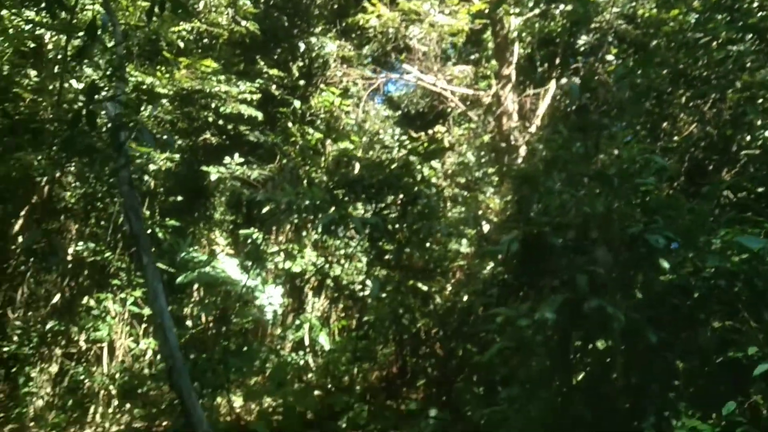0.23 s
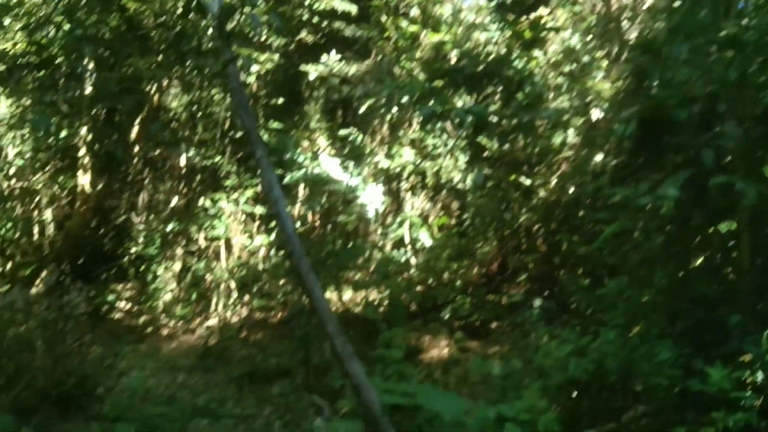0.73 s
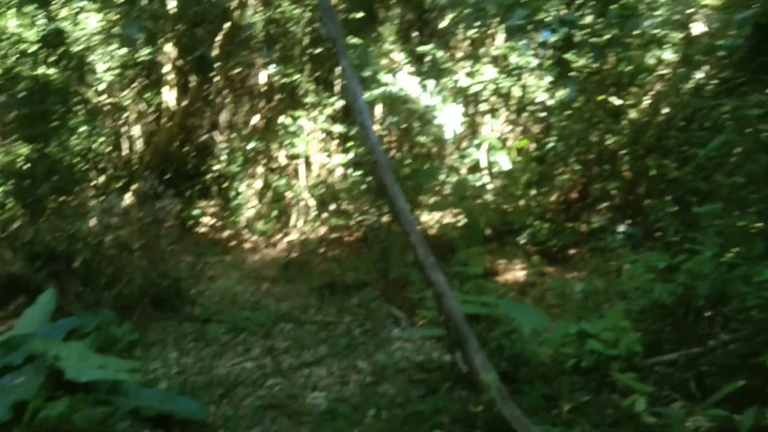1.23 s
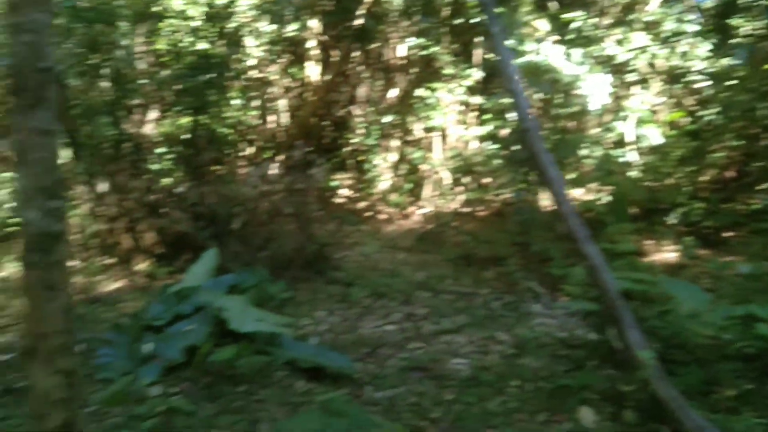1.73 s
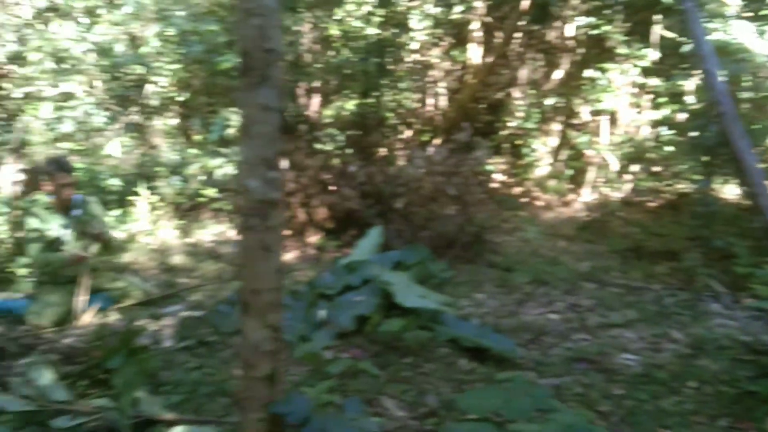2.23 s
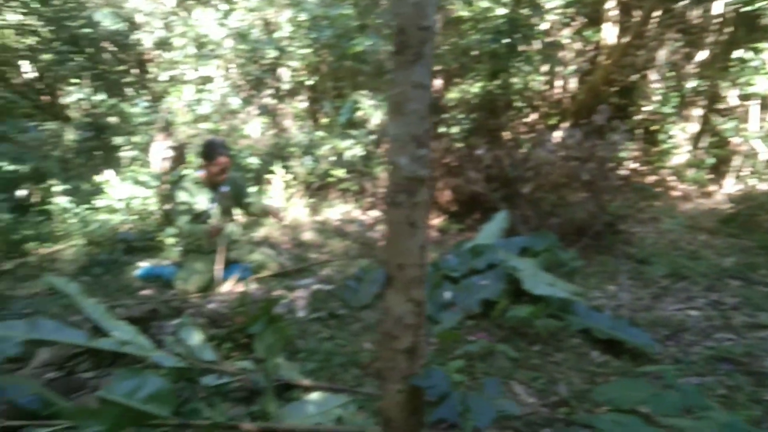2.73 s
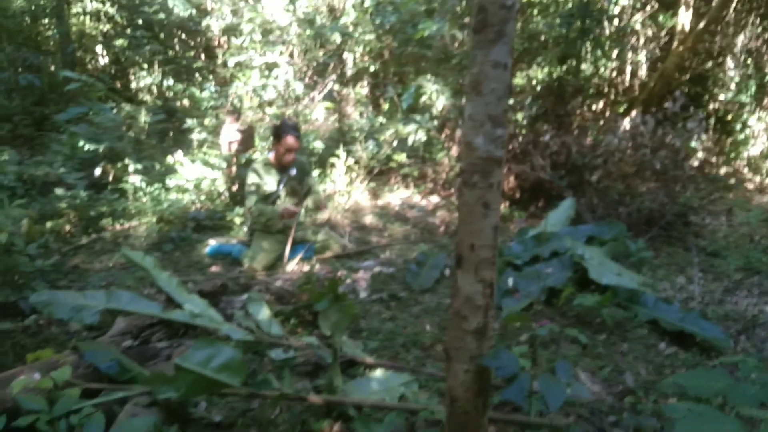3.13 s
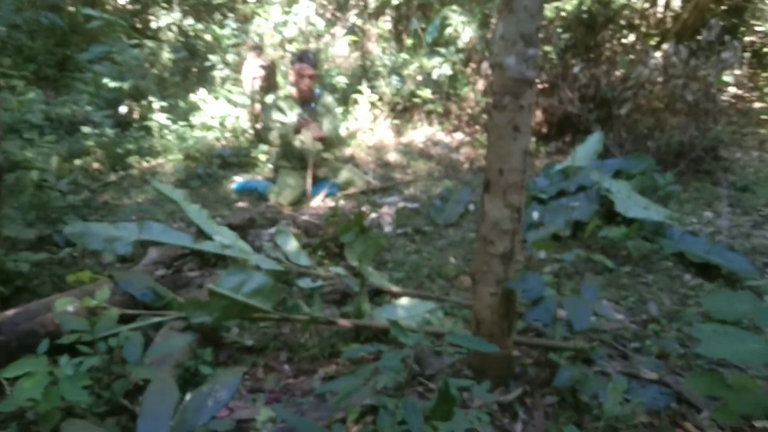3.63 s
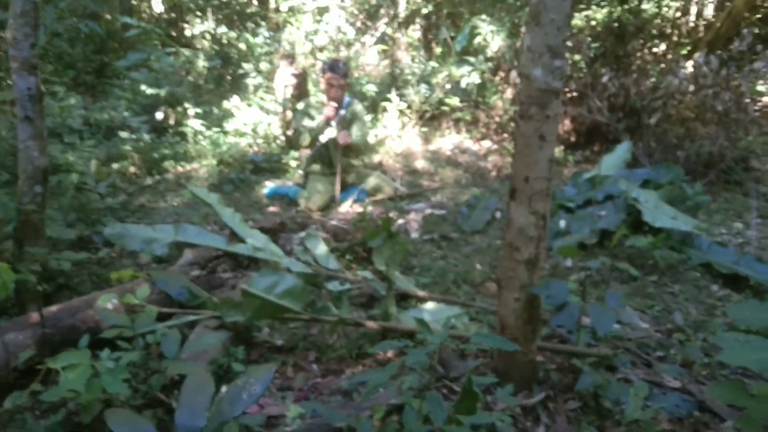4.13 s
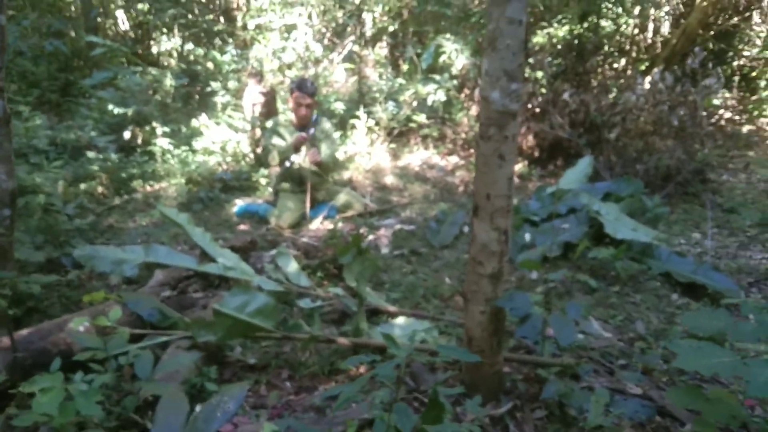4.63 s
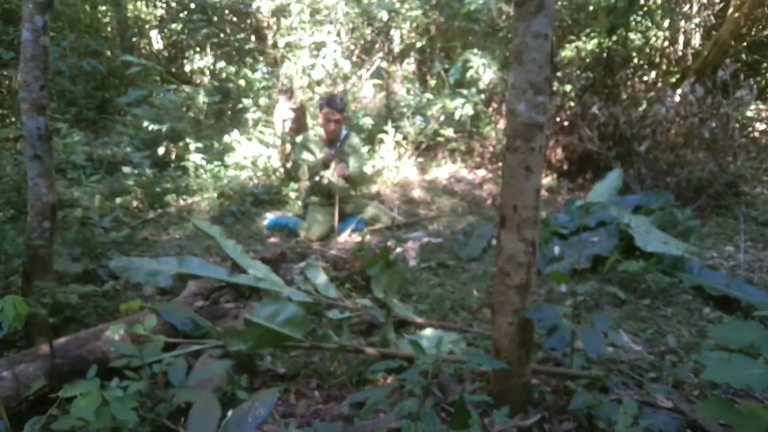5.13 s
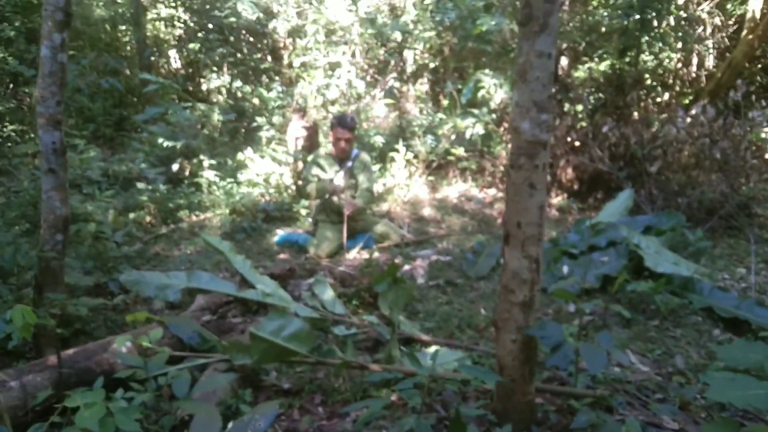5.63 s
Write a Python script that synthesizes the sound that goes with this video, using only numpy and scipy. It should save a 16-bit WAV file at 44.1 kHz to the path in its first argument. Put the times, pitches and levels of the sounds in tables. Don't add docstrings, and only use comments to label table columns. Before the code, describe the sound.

A quiet woodland heard through a small mono hand-held device. Someone steps slowly through brittle undergrowth, tearing twigs and leaf ribs in millisecond bursts. Low thumps and short woody knocks come through the housing. After a lull, a stalk cracks, more leaves snap, twigs whip the plastic hard, a leaf rasps along cloth, and a final knock and crackle close it. Distant cicadas throb and a cricket chirps faintly under thin hiss.

```python
import sys
import numpy as np
from scipy import signal
from scipy.fft import rfft, irfft
from scipy.io import wavfile

SR = 44100
rng = np.random.default_rng(int(sys.argv[2]) if len(sys.argv) > 2 else 0)


def amplitude_ratio(level_db):
    exponent = np.asarray(level_db, float) / 20
    return 10 ** exponent


def store_pcm(level_fs):
    pcm = np.round(np.clip(level_fs, -1, 1) * 32767).astype(np.int16)
    wavfile.write(sys.argv[1], SR, np.atleast_2d(pcm).T)


N = 259925

# f/Hz, density/dB per Hz
LEAVES = [(530, -37.5), (900, -6), (1770, -4.5), (2070, 0), (2300, -2.5), (2890, -3.5), (3550, -4),
          (5680, -5), (6250, -3), (6890, -7), (8150, -18), (11800, -30.5), (16000, -34)]


def rms_one(x):
    return x / np.sqrt(np.mean(x ** 2) + 1e-20)


def in_time(rows):
    s, *columns = np.transpose(rows)
    return [np.interp(np.arange(N) / SR, s, c) for c in columns]


def add(out, s, sound):
    at = round(s * SR)
    out[at:at + len(sound)] += sound[:N - at]


def colour(x, spectrum):
    hz, db = np.transpose(spectrum)
    bin_hz = np.arange(2049) * SR / 4096
    log_gain = np.log(amplitude_ratio(np.interp(np.log(bin_hz + 1), np.log(hz), db)))
    cepstrum = irfft(log_gain)
    cepstrum[1:2048] *= 2
    cepstrum[2049:] = 0
    response = irfft(np.exp(rfft(cepstrum)))
    return signal.fftconvolve(x, response / np.sqrt(np.sum(response ** 2)))[:len(x)]


def drift(rate_hz):
    r = np.exp(-2 * np.pi * rate_hz / SR)
    noise = rng.standard_normal(N + SR)
    return rms_one(signal.lfilter([1], [1, -2 * r, r * r], noise)[SR:])


def resonate(x, hz, width_hz):
    r = np.exp(-np.pi * width_hz / SR)
    poles = [1, -2 * r * np.cos(2 * np.pi * hz / SR), r * r]
    return signal.lfilter([(1 - r * r) / 2, 0, (r * r - 1) / 2], poles, x)


def resonate_steep(x, hz, width_hz):
    return resonate(resonate(x, hz, width_hz), hz, width_hz)


def crackle(per_s, spread_db):
    sizes = amplitude_ratio(spread_db * np.minimum(rng.exponential(1, N), 4)) * rng.choice([-1, 1], N)
    struck = rng.random(N) < per_s / SR
    return rms_one(sizes * struck / np.sqrt(per_s))


def flakes(per_s, spread_db, cycles):
    clicks = crackle(per_s, spread_db)
    pitches_hz = np.geomspace(900, 15000, 24)
    dealt = rng.integers(0, len(pitches_hz), N)
    total = np.zeros(N)
    for k, hz in enumerate(pitches_hz):
        own_clicks = clicks * (dealt == k) + 1e-18
        total += np.sqrt(hz) * rms_one(resonate(own_clicks, hz, hz / cycles))
    return rms_one(total)


def cracks():
    # peak t/s, peak level/dB, ring f/Hz
    early_ticks = [(0.3029, -30.5, 3720), (0.3056, -22.5, 3990), (0.307, -28, 3740), (0.3093, -30, 2970),
                   (0.311, -32, 2470), (0.3206, -27.5, 5000), (0.3228, -35, 5430), (0.331, -41, 3270),
                   (0.6014, -21.5, 4880), (0.6032, -22, 4380), (0.6057, -31, 3750), (0.61, -38, 4570),
                   (0.6124, -34, 4050), (0.6167, -35, 4570), (0.668, -17, 4070), (0.671, -23, 3700),
                   (0.6752, -32, 5100), (0.679, -33, 3360), (0.6816, -35, 3190), (0.6868, -33, 3860),
                   (0.689, -43, 4390), (0.9945, -48, 4160), (0.9972, -40, 3670), (0.9991, -41, 3770),
                   (1.003, -49, 3160), (1.3645, -37, 4050), (1.369, -42, 3720), (1.371, -34, 3620),
                   (1.3747, -37, 3960), (1.3768, -31, 3870), (1.3915, -28, 4260), (1.3943, -27, 5350),
                   (1.4066, -30, 3700), (1.4087, -30, 3930), (1.4135, -31, 3450), (1.416, -25, 3620),
                   (1.4187, -30, 5030), (1.4215, -30, 5340), (1.4255, -29, 3620), (1.428, -25, 3620),
                   (1.431, -30, 5740), (1.4338, -16, 3650), (1.435, -32.5, 4100), (1.4369, -16, 5140),
                   (1.44, -22, 5000), (1.4427, -30, 6500), (1.4459, -25, 3700), (1.4507, -17, 3374),
                   (1.4577, -21.5, 5170), (1.4605, -23.5, 4010), (1.4628, -20, 3750), (1.4655, -30, 1680),
                   (1.4717, -34, 3360), (1.4745, -41, 3840), (1.483, -37, 3800), (1.4948, -32, 2020),
                   (1.4975, -32, 2150)]
    # peak t/s, peak level/dB, ring f/Hz
    late_ticks = [(3.6576, -32, 5340), (3.66, -32, 4230), (3.6633, -38, 1780), (3.6655, -44, 1710),
                  (3.6867, -51, 4740), (3.6941, -50, 1970), (3.7115, -45, 1680), (3.7151, -45, 2070),
                  (4.1278, -46, 1940), (4.1317, -47, 1840), (4.1627, -25, 4650), (4.1656, -34, 1960),
                  (4.1676, -31, 4650), (4.1692, -37, 4740), (4.171, -37, 4480), (4.1734, -49, 2330),
                  (4.2576, -45, 4390), (4.267, -44, 3730), (4.2686, -46, 2930), (4.3143, -41, 3680),
                  (4.3158, -39, 4220), (4.3185, -52, 4310), (4.3211, -52, 4310), (5.0136, -41, 2400),
                  (5.0158, -42, 3900), (5.5585, -48.5, 2480), (5.5645, -44.5, 3100), (5.6485, -37, 3670),
                  (5.651, -36, 2170), (5.6548, -41, 4030), (5.6564, -24, 3600), (5.6583, -31, 2410),
                  (5.6606, -25.5, 3880), (5.6663, -32, 3440), (5.6689, -34, 3620), (5.6715, -24.5, 3620),
                  (5.6741, -28, 3600), (5.6771, -40, 4570), (5.6793, -35, 3880), (5.6828, -33, 3960),
                  (5.6892, -38, 3700), (5.6916, -36, 5770), (5.7055, -39, 3620), (5.8297, -47, 3190),
                  (5.8651, -40.5, 1580), (5.8683, -41, 3100), (5.8743, -46, 2840)]
    # peak t/s, peak level/dB
    stalks = [
        (3.212, -35),
        (3.215, -31),
        (3.2231, -39),
        (3.2267, -15),
        (3.232, -42),
    ]
    # peak t/s, peak level/dB, ring f/Hz,
    # length/s
    ribs = [(0.3024, -28, 4000, 0.00035), (0.3039, -21.5, 2950, 0.00033), (0.305, -34, 5570, 0.00045),
            (0.6017, -25, 3595, 0.00071), (.602, -27.5, 1690, 0.00058), (.6685, -25, 2230, 0.0005),
            (0.6693, -21.5, 3400, 0.00057), (0.96, -49.5, 1100, 0.00013), (1.498, -27.5, 3790, 0.00044),
            (2.183, -52, 1500, 0.00022), (1.3582, -36, 3450, 0.00032), (1.5042, -28.5, 1400, 0.00037),
            (2.15, -59, 2300, 0.00023), (2.194, -61, 2410, 0.0018), (2.815, -49.5, 1540, 0.00027),
            (2.886, -52, 1500, .0002), (3.315, -48, 2150, .0006), (3.475, -42, 2205, 0.00028),
            (3.6607, -31, 1670, 0.00063), (4.161, -21.5, 4420, 0.00047), (4.1616, -32, 2060, 0.00055),
            (4.165, -45, 7000, 0.00054), (4.317, -47, 7000, 0.00062), (5.488, -49, 3500, .0002),
            (5.52, -47, 1490, 0.00024)]
    tick_ratio, stalk_hz = 1.4, 3000
    found = []
    for s, db, hz in early_ticks + late_ticks:
        second_hz = hz * tick_ratio if hz < 4000 else hz / tick_ratio
        found.append((s, db + 3, hz, second_hz, 0.0003, -4))
    for s, db in stalks:
        found.append((s, db, stalk_hz, 2.135 * stalk_hz, 0.000106, -7.5))
    for s, db, hz, length_s in ribs:
        found.append((s, db, hz, 1.45 * hz, length_s, -2.5))
    return found


def snaps():
    # f/Hz, density/dB per Hz
    tearing = [(400, -40), (700, -11), (1170, -17.5), (1800, -6), (3160, -4), (5050, -6.5), (6500, -10),
               (8000, -19.5), (9500, -26.5), (12000, -44), (15000, -37), (16400, -43)]
    out, t = np.zeros(N), np.arange(1500) / SR
    for s, db, main_hz, second_hz, length_s, broad_db in cracks():
        age = t / length_s
        burst = rng.standard_normal(len(t)) * age * np.exp(-age)
        main = rms_one(resonate_steep(burst, main_hz, 600))
        second = rms_one(resonate_steep(burst, second_hz, 1000))
        broad = rms_one(colour(burst, tearing))
        sound = main - amplitude_ratio(-7) * second + amplitude_ratio(broad_db + 0.5) * broad
        peak_at = np.abs(sound).argmax()
        add(out, s - peak_at / SR, amplitude_ratio(db) * sound / np.abs(sound).max())
    return out


def settling():
    # t/s, level/dB, centre f/Hz, t60/s
    settles = [(0.177, -67, 2800, 2.1), (0.3, -48, 3930, 0.37), (0.602, -47.5, 4330, 0.55),
               (0.666, -49, 3400, 0.43), (0.959, -66.5, 4000, 0.27), (0.995, -59, 3700, 0.23),
               (1.361, -43.5, 3720, 0.52), (1.387, -47, 4600, .54), (1.41, -44, 3750, 0.19),
               (1.431, -40.5, 5140, 0.25), (1.458, -53, 2870, 0.9), (3.012, -63.5, 2900, 0.77),
               (3.227, -66, 2740, 0.51), (3.653, -46.5, 5000, 0.045), (4.163, -61, 3400, 0.7),
               (4.313, -49, 4200, 0.1), (5.011, -50.5, 4530, 0.13), (5.556, -64.5, 2720, 2.8),
               (5.645, -45, 3380, 0.44), (5.668, -47, 4200, 0.32), (5.824, -57, 3400, 0.32),
               (5.864, -55, 2950, 0.076)]
    # t/s, level/dB, t60/s
    shuffles = [
        (2.178, -63.5, 0.91),
        (2.315, -68, .46),
        (2.462, -63.5, 0.37),
        (2.66, -64, 0.68),
        (2.815, -62, 0.37),
        (3.069, -67.5, .8),
        (3.667, -53.5, 0.32),
        (3.69, -57.5, 0.28),
        (4.128, -56.5, 0.95),
        (4.638, -42, 0.053),
    ]
    out, t = np.zeros(N), np.arange(SR // 2) / SR
    fine = amplitude_ratio(0.63 * drift(73.7)) * flakes(6000, spread_db=1.5, cycles=9.2)
    for s, db, hz, t60_s in settles + [(s, db, None, t60_s) for s, db, t60_s in shuffles]:
        grains = fine[round(s * SR):][:len(t)]
        age = t[:len(grains)]
        fading = grains * (1 - np.exp(-age / 0.0012)) * amplitude_ratio(db - 60 * age / t60_s)
        fresh = fading * np.exp(-age / 0.44)
        if hz:
            sound = 2.26 * resonate_steep(fading, hz, 0.61 * hz) + 0.95 * fresh
        else:
            sound = fresh
        add(out, s, colour(sound, LEAVES))
    return out


def leaves():
    # t/s, level/dB
    brush = [(0.0, -73), (0.25, -68), (1.03, -69), (1.41, -79.5), (1.52, -59.5), (1.79, -71.5), (2.05, -73),
             (2.35, -68.5), (2.98, -72), (3.18, -64), (3.43, -69.5), (3.71, -68), (4.05, -72), (4.35, -63),
             (5.0, -75), (5.45, -69.5), (5.75, -58.5), (5.89, -61.5)]
    # f/Hz, density/dB per Hz
    dull_spectrum = [(150, -44.5), (250, 0), (707, 3), (1190, -2), (1540, -1.5), (1710, -1.5),
                     (2000, -11.5), (3000, -6), (3900, -20), (6600, -120)]
    # t/s, level/dB
    drags = [
        [(4.96, -100), (4.996, -56), (5.09, -66.5)],
        [(5.1, -65), (5.13, -61.5), (5.178, -46.5), (5.24, -49.5), (5.302, -65.5), (5.33, -65.5)],
    ]
    # f/Hz, density/dB per Hz
    cloth = [(290, -62), (500, -67), (544, -10.5), (851, -5), (1050, -15.5), (1350, -0.5), (2080, -10),
             (2210, -16), (2440, -6), (3550, -7), (3910, -10), (4680, -2.5), (9000, -34), (11700, -57),
             (19800, -120)]
    brush_db, = in_time(brush)
    per_s = 4000 * amplitude_ratio(2.0 * drift(11))
    crisp = amplitude_ratio(brush_db + 0.66 * drift(22)) * colour(flakes(per_s, spread_db=0.0, cycles=2.7), LEAVES)
    dull = amplitude_ratio(brush_db + 1.5 + 0.5 * drift(29)) * colour(crackle(per_s, spread_db=4.0), dull_spectrum)
    drag_db, = in_time([(4.94, -110)] + sum(drags, []) + [(5.36, -110)])
    drag = amplitude_ratio(drag_db + 3.5 + 1.1 * drift(76)) * colour(crackle(6000, spread_db=1.5), cloth)
    return crisp + dull + drag


def damped_blows(table, t60_s, lag_s, rise, rough, sag, under):
    out, t = np.zeros(N), np.arange(8000) / SR
    for s, db, hz in table:
        sagging_hz = hz * (1 + sag * (np.exp(-t * hz / 1.45) - 0.5))
        phase = 2 * np.pi * np.cumsum(sagging_hz) / SR
        grit = rms_one(resonate_steep(rng.standard_normal(len(t)), 1.14 * hz, 1.13 * hz))
        tone = np.sin(phase) + under * np.sin(0.47 * phase) + rough * grit
        sound = tone * amplitude_ratio(-60 * t / t60_s) * (1 - np.exp(-t * hz / rise)) ** 2
        add(out, s + lag_s, amplitude_ratio(db) * sound / np.abs(sound).max())
    return out


def knocks():
    # t/s, peak level/dB, ring f/Hz
    blows = [(0.173, -39.5, 890), (0.1955, -44.5, 482), (0.2505, -41, 480), (0.2885, -38, 497),
             (0.301, -39, 263), (.599, -50.5, 450), (.666, -44.5, 423), (0.953, -43, 523),
             (0.968, -51, 298), (1.432, -41.5, 378), (1.4585, -23, 630), (1.471, -38, 482),
             (1.492, -41, 460), (1.502, -39.5, 494), (2.176, -55, 507), (2.316, -55, 244),
             (2.461, -49.5, 248), (2.658, -52, 440), (2.814, -44.5, 620), (3.028, -53, 415),
             (3.213, -42.5, 235), (3.225, -37, 675), (3.471, -39, 430), (4.157, -39, 246),
             (4.311, -28.5, 653), (4.638, -35, 263), (4.645, -28.5, 354), (5.0085, -31.5, 847),
             (5.647, -17.5, 782), (5.671, -34.5, 896)]
    return damped_blows(blows, t60_s=0.014, lag_s=0.00197, rise=0.86, rough=0.35, sag=0.1, under=0.38)


def footfalls():
    # t/s, peak level/dB, ring f/Hz
    thumps = [(0.2, -49, 98.5), (0.252, -45, 72.7), (0.289, -41.5, 150), (0.367, -49.5, 87.5),
              (0.692, -52.5, 108), (0.749, -54, 95), (0.942, -52.5, 205), (1.068, -53, 193),
              (1.462, -45, 93), (1.781, -55, 128), (2.173, -47.5, 95), (2.313, -46.5, 102),
              (2.46, -47, 105), (2.66, -51, 124), (2.813, -46.5, 138), (3.029, -49, 91.3), (3.115, -46, 98),
              (3.219, -42.5, 146), (3.471, -41.5, 120), (3.6525, -35.5, 82.2), (4.111, -47.5, 96.9),
              (4.1575, -28.5, 82.6), (4.256, -47, 99), (4.307, -44, 127), (4.407, -48.5, 112),
              (4.632, -31.5, 208), (4.642, -40.5, 90), (5.01, -45.5, 182), (5.655, -42, 105),
              (5.679, -49, 87), (5.878, -56, 61.9)]
    return damped_blows(thumps, t60_s=0.11, lag_s=0.0013, rise=0.17, rough=0.6, sag=0.64, under=0.079)


def taps():
    # t/s, level/dB
    whips = [
        (4.6374, -1.5),
        (4.6397, -28),
        (4.646, -22),
        (4.647, -9.5),
        (4.649, -15.5),
        (4.679, -37),
    ]
    # f/Hz, level/dB, t60/s
    modes = [(890, -4.5, 0.0031), (1630, 0.5, 0.0046), (2030, -1, 0.0037), (3100, 2, 0.0047),
             (4420, -4.5, 0.0042), (6100, -3.5, 0.0038), (8300, -28, 0.0038), (10300, -25.5, .003),
             (14800, -32, .003)]
    out, t = np.zeros(N), np.arange(800) / SR
    for s, db in whips:
        rings = np.zeros(len(t))
        for k, (hz, mode_db, t60_s) in enumerate(modes):
            softness_db = 0.11 * db * np.log2(hz / 2200)
            struck_db = mode_db + 0.8 * rng.standard_normal() + softness_db
            rings += (-1) ** k * amplitude_ratio(struck_db - 60 * t / t60_s) * np.sin(2 * np.pi * hz * t)
        add(out, s, amplitude_ratio(db - 3.0) * rings * (1 - np.exp(-t / 0.00015)))
    return out


def handling():
    # t/s, level/dB
    motion = [(0.0, -73), (0.33, -57), (0.5, -66), (1.2, -68.5), (1.5, -66), (2.9, -67), (3.2, -65),
              (3.95, -71.5), (4.5, -58), (4.85, -71.5), (5.89, -62)]
    # f/Hz, density/dB per Hz
    spectrum = [(12, -50), (20, -42), (32, -32.5), (62, -7), (92, -3.5), (182, -10.5), (273, -12.5),
                (500, -22.5), (650, -51), (1100, -120)]
    motion_db, = in_time(motion)
    return amplitude_ratio(motion_db + 1.9 * drift(6.7)) * colour(rng.standard_normal(N), spectrum)


def song(hz, width_hz):
    lowpass = signal.butter(2, width_hz / 2, fs=SR, output="sos")
    slow = signal.sosfilt(lowpass, rng.standard_normal((2, N)))
    phase = 2 * np.pi * np.cumsum(hz) / SR
    return rms_one(slow[0] * np.cos(phase) + slow[1] * np.sin(phase))


def cicadas():
    # t/s, pitch f/Hz, level/dB
    chorus = [(0, 6460, -68.5), (.25, 6260, -97), (1.9, 6100, -77.5), (2.2, 6195, -67), (2.7, 6290, -70),
              (3.2, 6340, -66.5), (4.04, 6100, -78), (4.45, 6180, -68.5), (4.9, 6130, -77.5),
              (5.3, 6090, -67), (5.89, 5850, -82)]
    hz, db = in_time(chorus)
    beat = 2 * np.pi * np.cumsum(47.3 + 0.42 * drift(0.89)) / SR
    throb = 1 + 0.37 * np.sin(beat) + 0.14 * np.sin(beat / 2)
    return amplitude_ratio(db - 1.0) * throb * song(hz, width_hz=220)


def cricket():
    # start t/s, length/s, pitch f/Hz, level/dB
    phrases = [
        (-.05, 0.22, 4210, -73),
        (0.368, 0.16, 4260, -66),
        (.98, 0.2, 3730, -66),
        (1.962, .32, 4265, -75),
        (2.602, 0.22, 4150, -78),
        (2.9, .42, 4240, -74),
        (3.33, 0.27, 4300, -72),
        (3.703, 0.21, 4240, -69.5),
        (5.235, 0.22, 4260, -65.5),
    ]
    edge_s, edge_db, rise_hz_per_s = 0.07, 16, 300
    t, pitch_hz, level = np.arange(N) / SR, np.zeros(N), np.zeros(N)
    for s, length_s, hz, db in phrases:
        inside = np.minimum(t - s, s + length_s - t) / edge_s
        creeping_hz = hz + rise_hz_per_s * (np.minimum(t - s, length_s) - length_s / 2)
        pitch_hz = np.where(t > s - 0.1, creeping_hz, pitch_hz)
        level += amplitude_ratio(db + edge_db * np.minimum(inside - 1, 0))
    return level * amplitude_ratio(1.2 * drift(6.5)) * song(pitch_hz, width_hz=170)


def forest_air():
    # f/Hz, density/dB per Hz
    spectrum = [(120, -46.5), (200, -4.5), (612, -8.5), (1180, -24), (4040, -10.5), (5230, -22.5),
                (6170, -8.5), (7540, -36), (12200, -27), (14900, -31.5), (16000, -41)]
    return amplitude_ratio(-69.5) * colour(rng.standard_normal(N), spectrum)


def scene():
    litter = snaps() + settling() + leaves()
    contact = knocks() + footfalls() + taps() + handling()
    background = cicadas() + cricket() + forest_air()
    return (litter + contact + background)[None]


def roll_off(x):
    return signal.sosfilt(signal.butter(12, 16530, fs=SR, output="sos"), x)


def record(dry):
    # f/Hz, gain/dB
    microphone = [(20, -12), (45, -1), (70, 0.5), (7000, -3.5), (10000, 0.5), (12500, -4.5), (15000, 6),
                  (15600, -0.5), (15900, -41), (17000, -80)]
    mix = amplitude_ratio(-2.5) * colour(dry[0], microphone)[None]
    return roll_off(mix)


dry = scene()
out = record(dry)
store_pcm(out)
```